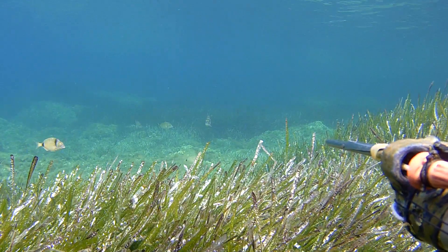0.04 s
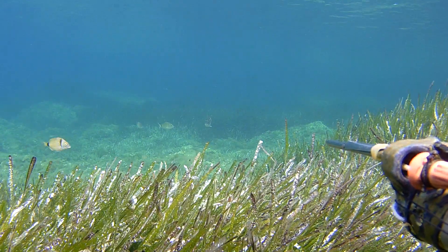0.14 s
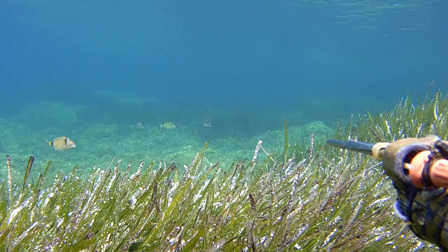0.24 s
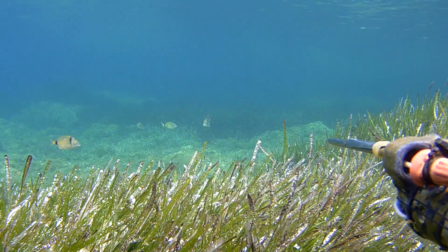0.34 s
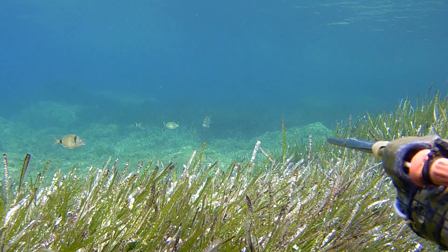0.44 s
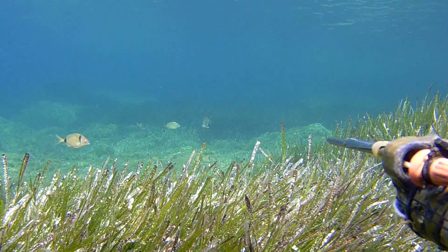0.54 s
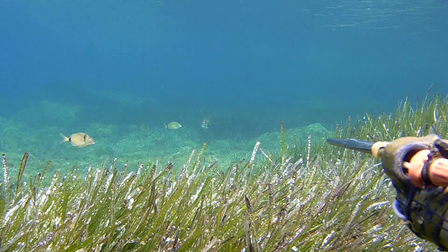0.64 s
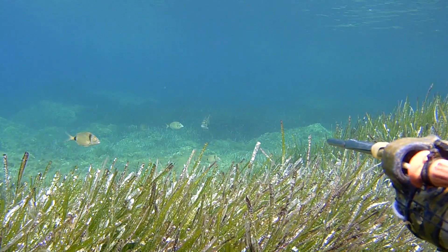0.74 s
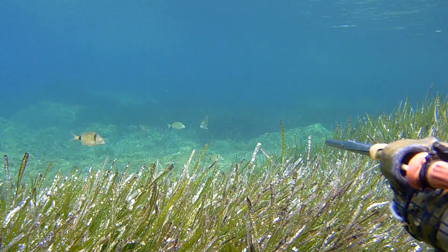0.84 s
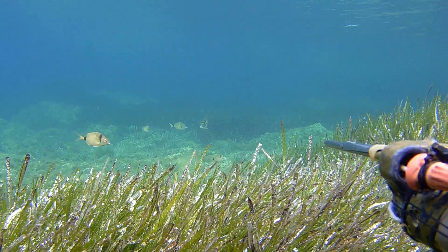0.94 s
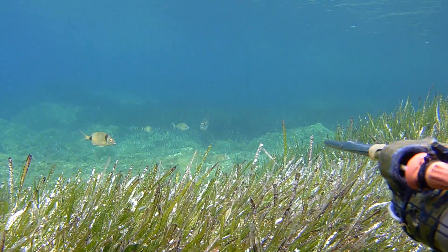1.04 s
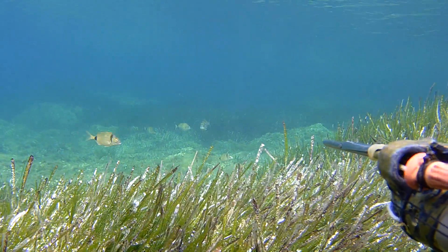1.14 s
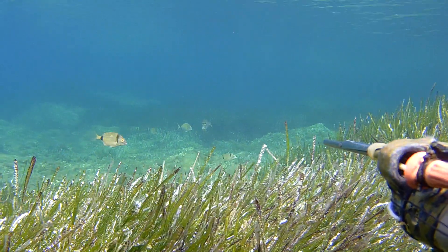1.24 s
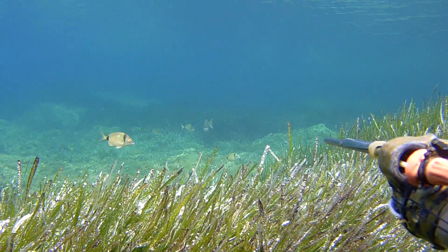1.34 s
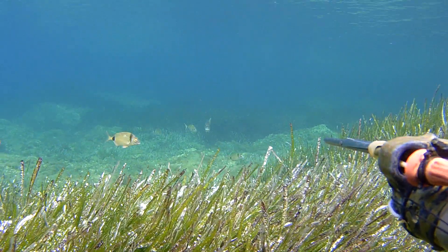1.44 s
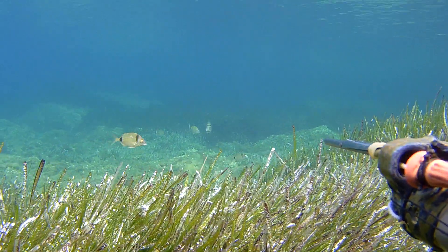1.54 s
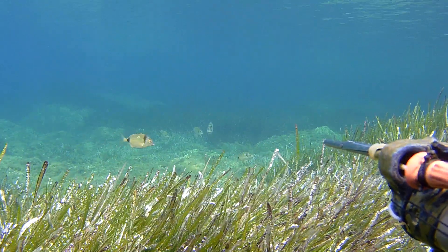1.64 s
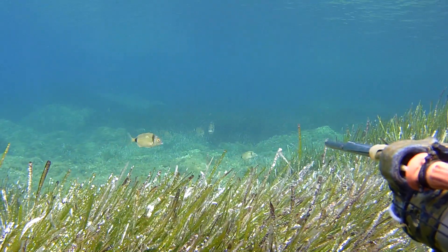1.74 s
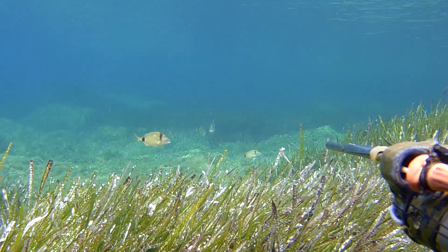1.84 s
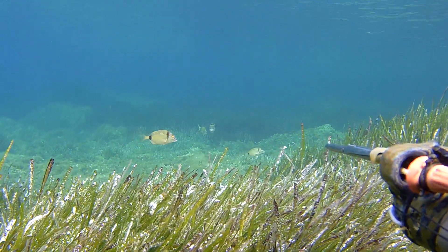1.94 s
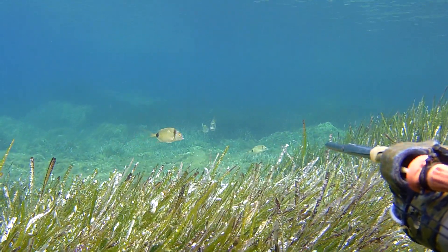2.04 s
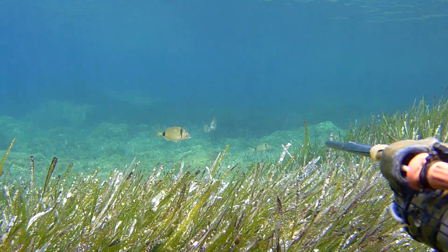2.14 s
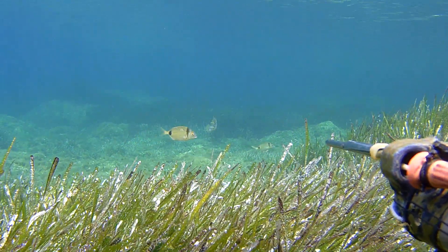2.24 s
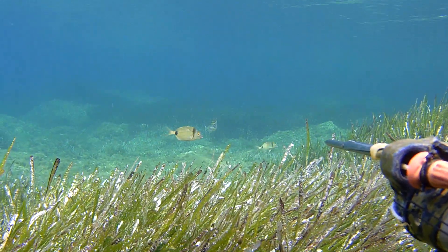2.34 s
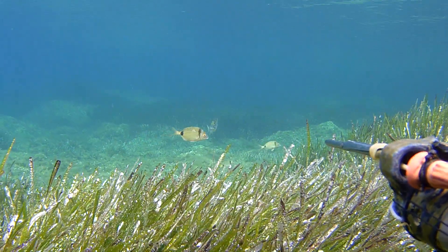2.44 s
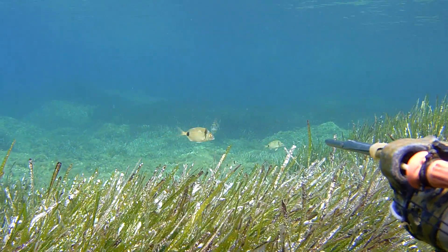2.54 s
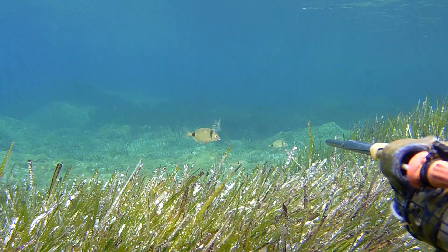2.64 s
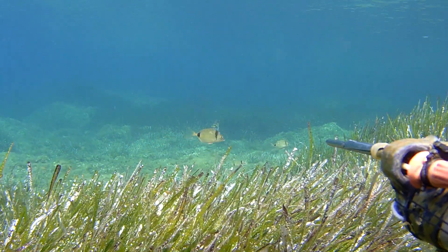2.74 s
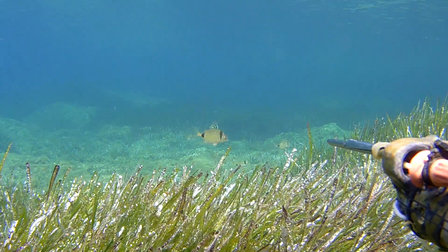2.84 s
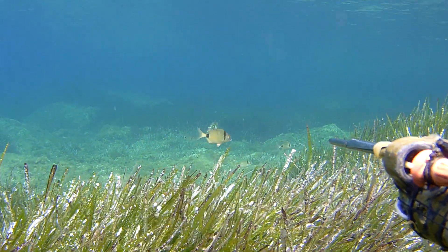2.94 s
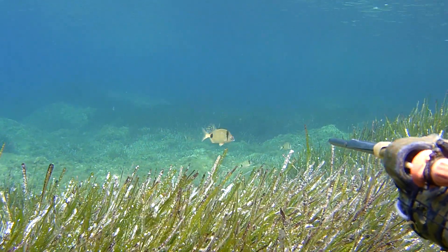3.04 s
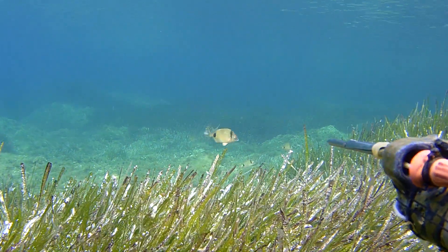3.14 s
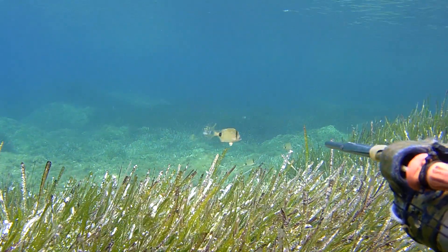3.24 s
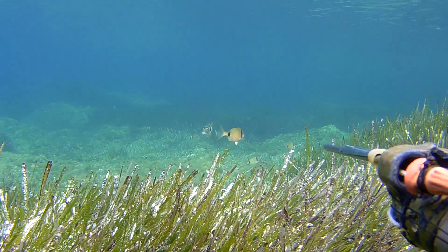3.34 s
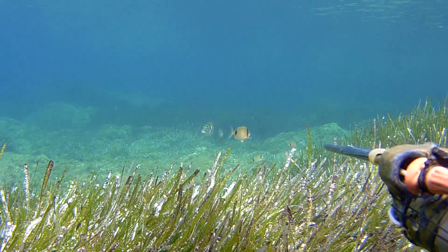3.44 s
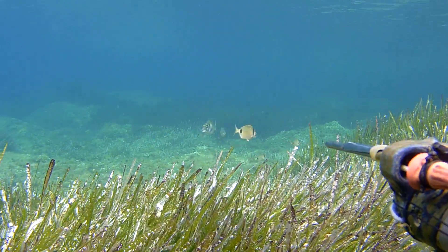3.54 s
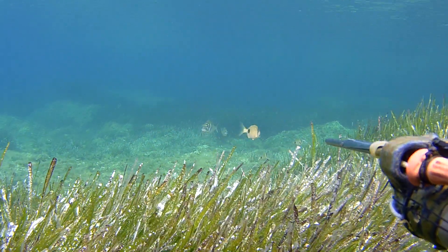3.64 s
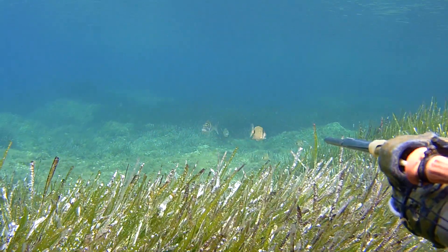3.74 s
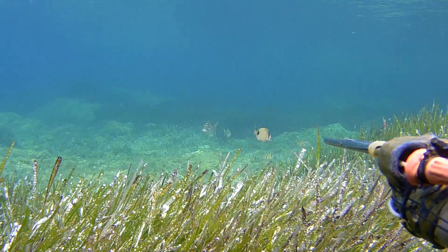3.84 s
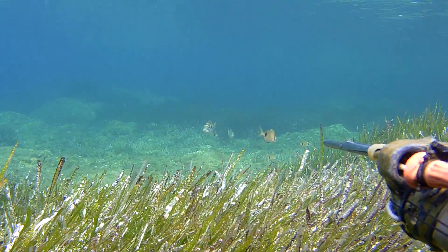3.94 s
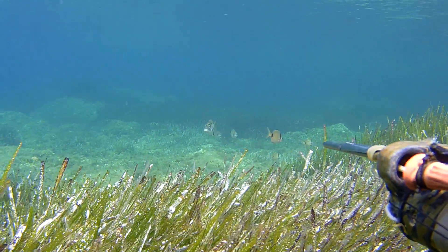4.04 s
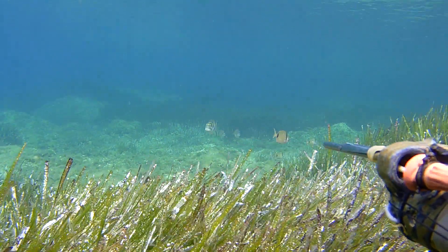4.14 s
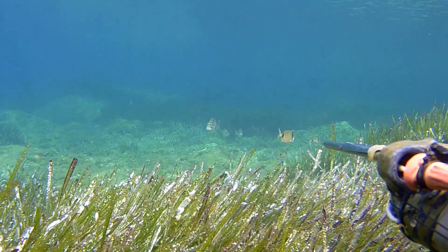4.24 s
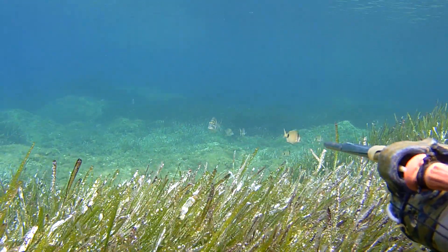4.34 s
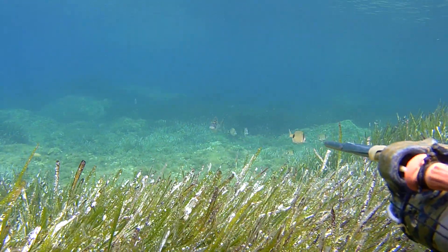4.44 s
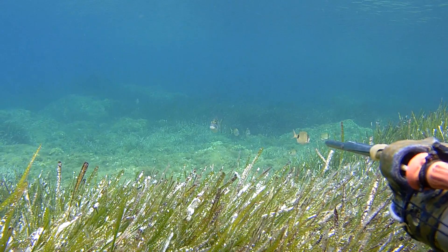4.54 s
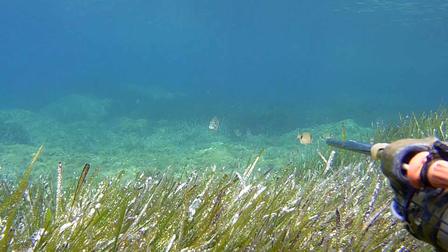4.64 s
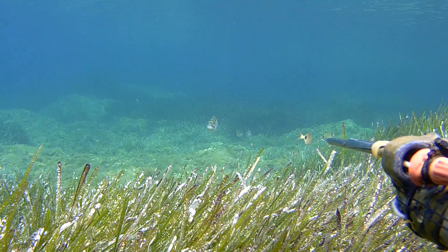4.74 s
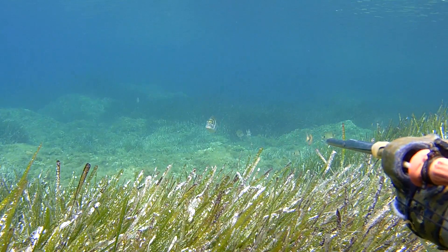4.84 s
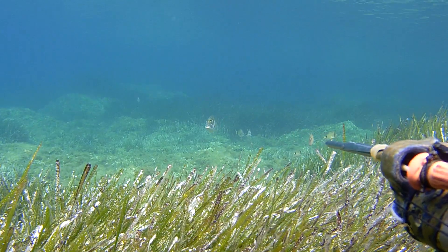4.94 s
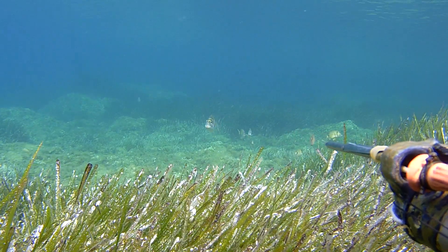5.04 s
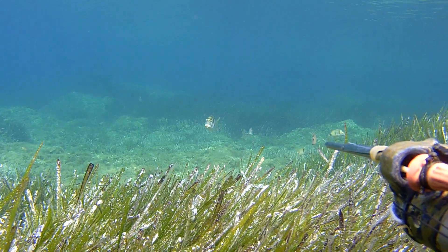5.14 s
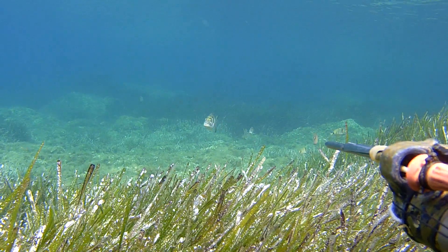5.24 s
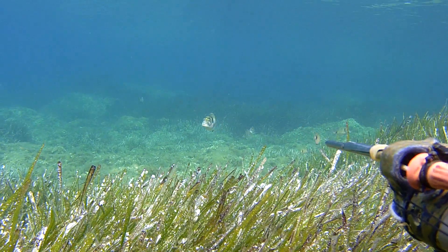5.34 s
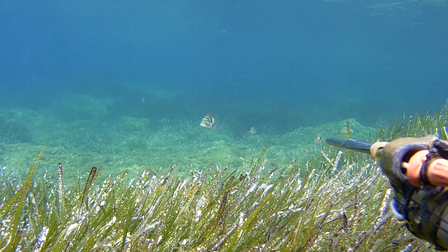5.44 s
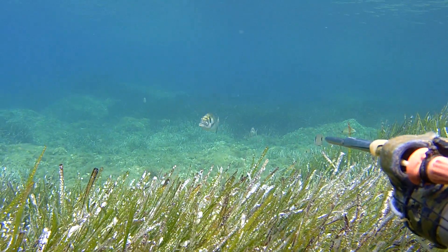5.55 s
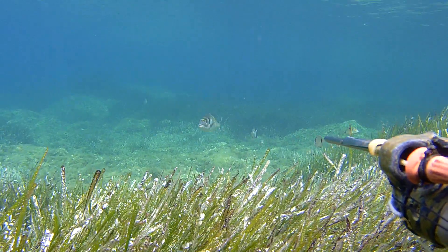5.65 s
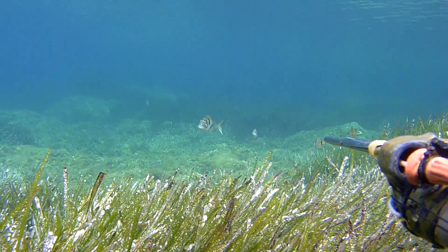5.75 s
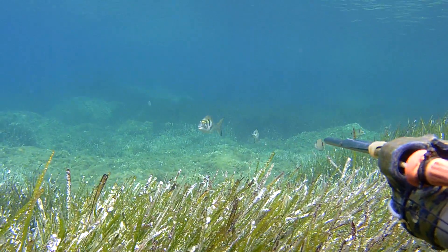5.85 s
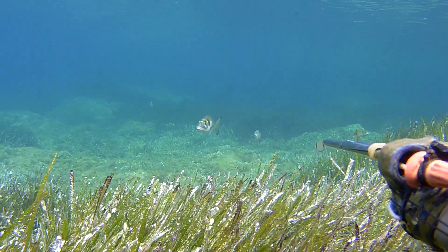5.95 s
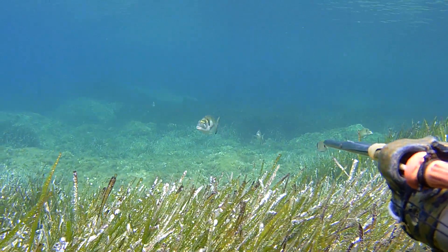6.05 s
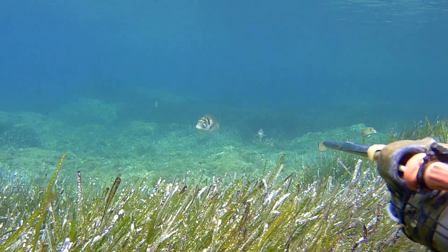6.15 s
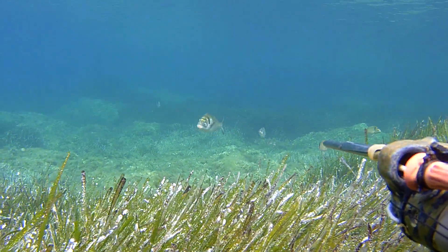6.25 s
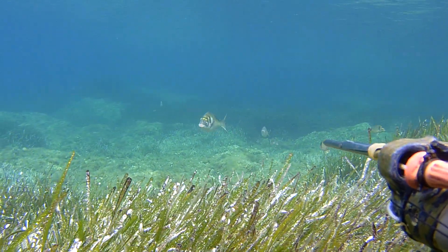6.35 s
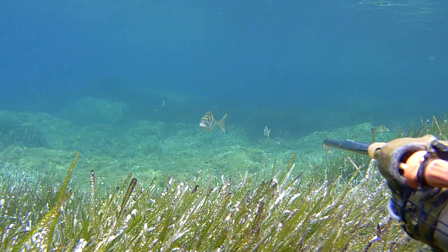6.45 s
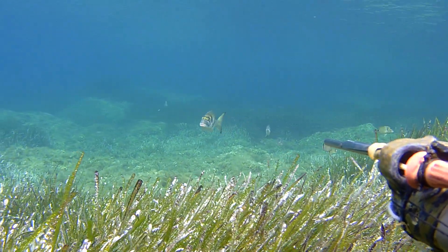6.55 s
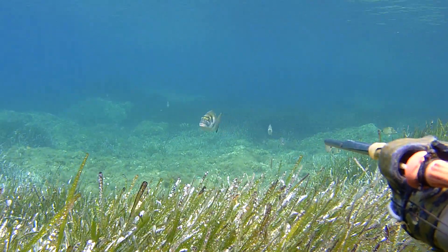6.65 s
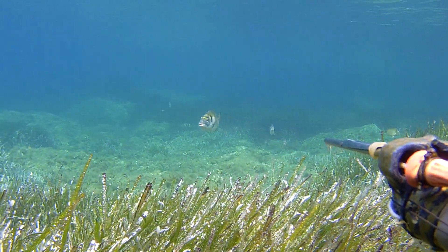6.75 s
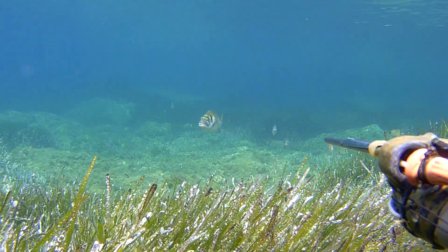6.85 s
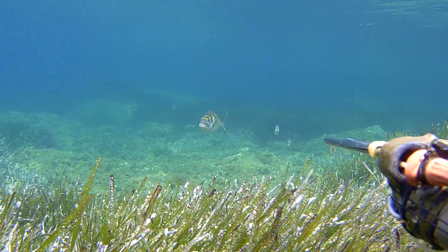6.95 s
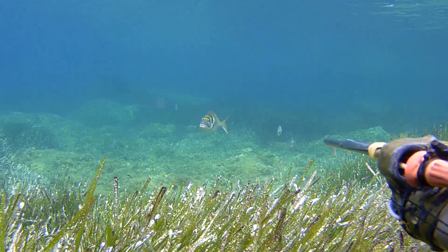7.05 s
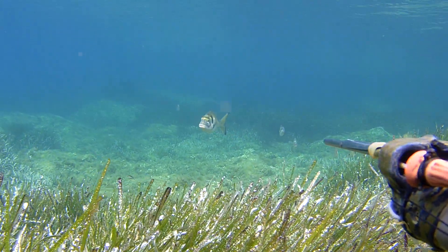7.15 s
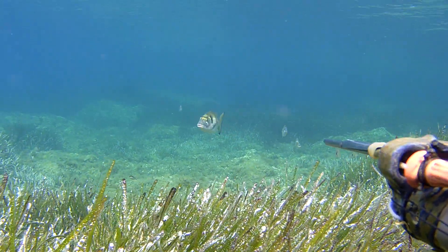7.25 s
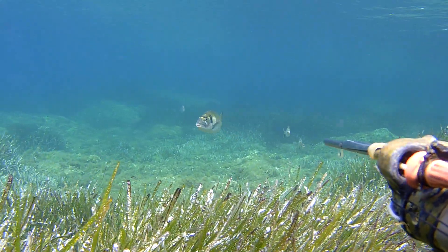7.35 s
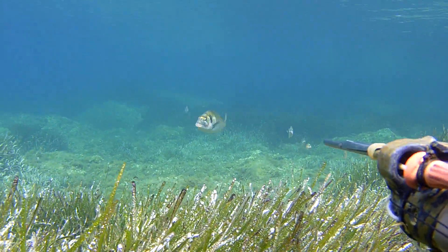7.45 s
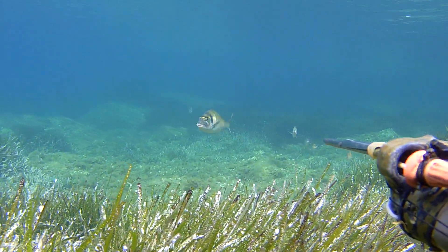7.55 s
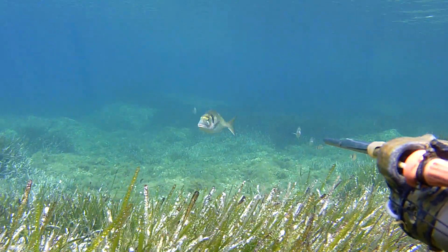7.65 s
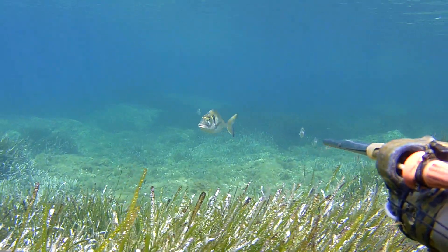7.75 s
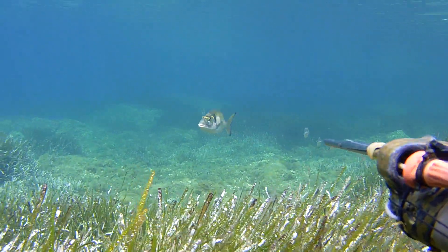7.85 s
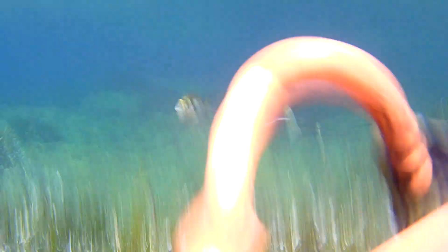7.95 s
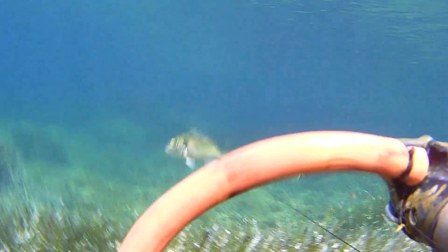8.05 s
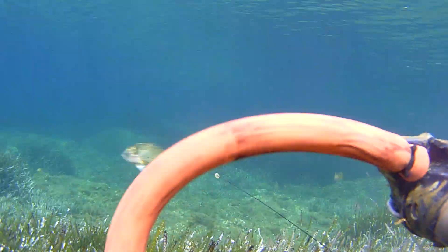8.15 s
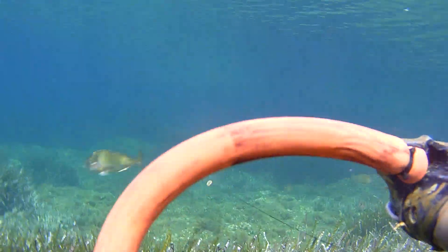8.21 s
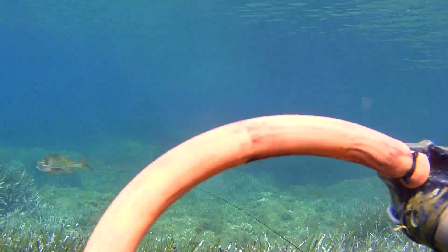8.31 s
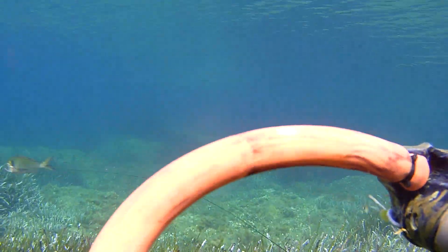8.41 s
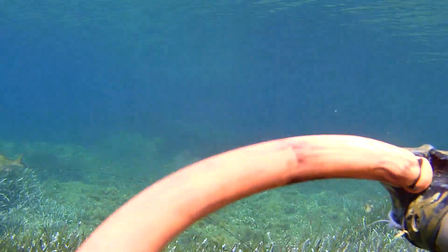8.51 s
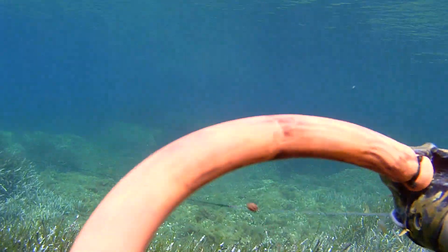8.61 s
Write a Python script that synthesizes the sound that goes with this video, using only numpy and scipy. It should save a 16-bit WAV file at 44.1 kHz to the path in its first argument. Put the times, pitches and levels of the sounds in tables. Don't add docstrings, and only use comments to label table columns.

```python
import sys
import numpy as np
from scipy import signal
from scipy.fft import rfft, irfft
from scipy.io import wavfile

SR = 44100
rng = np.random.default_rng(int(sys.argv[2]) if len(sys.argv) > 2 else 0)


def gain_from_db(level_db):
    decades = np.asarray(level_db, float) / 20
    return 10 ** decades


def output_pcm(signal):
    pcm = np.clip(np.atleast_2d(signal).T, -1, 1) * 32767
    wavfile.write(sys.argv[1], SR, np.round(pcm).astype(np.int16))


N = 382788

# (frequency [Hz], level [dB], t60 [s])
BARREL_LOW_MODES = [(335, -13.5, 0.033), (503.5, -5.5, 0.05), (599, -10.5, 0.089), (731.6, 3.5, 0.033),
                    (865, 4.5, 0.0095)]
BARREL_HIGH_MODES = [(1050, -2.5, 0.013), (1215, 3.5, 0.025), (1390, 5, 0.0031), (1470, 0.5, 0.035),
                     (1748, 2.5, 0.013), (2242, -1, 0.014)]
# (frequency [Hz], level [dB], t60 [s])
WALL_MODES = [(390, 2.5, 0.019), (546, -4.5, 0.35), (630, 4.5, 0.092), (735, 11.5, 0.073)]
LID_MODES = [(1320, -13.5, 0.017), (1464, -8, 0.044), (1740, 2.5, 0.016), (2350, -8, 0.016)]
PORT_MODES = [(2767, 2, 0.015), (3207, 6.5, 0.0085), (3632, 5.5, 0.013), (4530, 8, 0.0096),
              (5630, -10, 0.015)]
RIM_MODES = [(6244, 17, 0.0061), (7300, 16.3, 0.0027), (8910, 9.6, 0.0069), (10500, 13.2, 0.0022),
             (11800, 3.5, 0.0042), (13000, 9.7, 0.0027)]
# (frequency [Hz], level [dB], t60 [s])
SHELL_MODES = [(980, 0, 0.01), (1180, 6, 0.069), (1502, 0.5, 0.12)]
# (time [s], length [s], low barrel [dB], high barrel [dB], crack [dB])
BLOWS = [(7.942, 0.0074, -34, -41, -57), (7.9486, 0.0054, 8, 2.5, -27), (7.965, 0.018, 4.5, 7.5, -25),
         (7.986, 0.011, 8.5, -11.5, -4), (7.996, 0.024, -2.5, 3.5, -6), (8.028, 0.004, -15, -8.5, -3.5),
         (8.038, 0.0049, -7.5, -5, -8.5), (8.049, 0.013, -26, -35, -34), (8.058, 0.0073, -24, -25, -45),
         (8.073, 0.0083, -22, -15, -33), (8.112, 0.0027, -1.5, -10, -21.5), (8.12, 0.0046, -20, -40, -56),
         (8.139, 0.01, -26, -45, -56), (8.152, 0.032, -23, -29.5, -63), (8.2, 0.0023, -42, -40, -44),
         (8.5315, 0.0029, -14, -13, -9.5), (8.5442, 0.0018, -22, -17, -15), (8.573, 0.019, -40, -39, -65)]
# (time [s], level [dB])
KICKS = [
    (7.954, -5),
    (8.001, -3.5),
    (8.118, -22),
    (8.441, -44),
    (8.536, -31),
]
# (time [s], level [dB], pitch [Hz], t60 [s])
THUMPS = [
    (7.905, -46, 27, .9),
    (7.9533, 10.5, 111, 0.052),
    (7.977, 0.5, 324, 0.067),
    (7.994, 10.5, 154.1, 0.071),
    (8.043, -12.5, 322, 0.053),
    (8.094, -17.5, 75, .1),
]
# (time [s], low barrel [dB], high barrel [dB], click [dB])
LINE_TICKS = [(8.222, -60, -48, -54), (8.247, -26, -38, -45), (8.253, -25.5, -40, -58),
              (8.263, -56, -35, -44), (8.282, -24, -27, -39.5), (8.3012, -30, -22.5, -36),
              (8.318, -39, -50, -63), (8.34, -26, -39, -54), (8.348, -25, -34, -43), (8.359, -26, -44, -59),
              (8.381, -34, -52, -39), (8.387, -16.5, -27, -38.5), (8.395, -27, -34, -51),
              (8.405, -21, -36, -52), (8.417, -15, -29, -42), (8.433, -19, -43, -53),
              (8.444, -23, -29, -56), (8.452, -21, -23.5, -30.5), (8.468, -17, -20.5, -37),
              (8.4785, -19, -25, -43), (8.487, -25, -48, -46), (8.496, -23, -28, -47),
              (8.501, -15, -33, -49), (8.51, -19.5, -27, -43), (8.598, -39, -58, -35.5),
              (8.6154, -18, -36, -42), (8.631, -32, -36, -57), (8.639, -46, -38, -46),
              (8.6633, -42, -32, -41), (8.676, -35, -29, -48)]
# (time [s], level [dB])
LINE_PULL = [
    (8.0, -51),
    (8.07, -23),
    (8.105, -37),
    (8.13, -30.5),
    (8.22, -52),
    (8.26, -40),
    (8.47, -40),
    (8.56, -56.5),
    (8.68, -38.5),
]
# (time [s], level [dB], pitch [Hz])
TWANGS = [(8.2403, -44, 1110), (8.249, -34, 1110), (8.278, -24, 1070), (8.283, -35, 1210),
          (8.3017, -22, 1130), (8.3216, -38, 1020), (8.34, -27, 1160), (8.3478, -25.5, 1160),
          (8.36, -28, 1110), (8.39, -22, 1100), (8.396, -25, 1050), (8.4064, -20, 1090),
          (8.4173, -17.5, 940), (8.4443, -19, 965), (8.4547, -17.5, 1040), (8.459, -20, 950),
          (8.4692, -17, 1040), (8.4786, -14.5, 1100), (8.496, -21, 1050), (8.5013, -16, 1140),
          (8.5104, -15, 1100), (8.6506, -31, 942), (8.631, -34, 1800), (8.6645, -17, 1980)]
# (time [s], level [dB], pitch [Hz], t60
# [s])
CLACKS = [(0.6008, -18, 1540, 0.013), (.6, -24.5, 3600, 0.013), (.606, -41, 1760, 0.026),
          (1.4164, -28, 1640, 0.01), (1.4161, -22, 3170, 0.0078), (1.4158, -33.5, 7700, .008),
          (1.416, -36.5, 740, 0.046), (2.5472, -34.5, 1380, 0.014), (2.5472, -25, 3140, 0.0099),
          (2.5472, -26.5, 4600, 0.012), (8.157, -23, 1145, 0.033), (8.2006, -29, 2100, 0.017),
          (8.202, -31, 1670, .016), (8.249, -30, 720, 0.055), (8.302, -21.5, 740, 0.071),
          (8.36, -33, 700, 0.068), (8.452, -28.5, 450, 0.097), (8.48, -27, 492, 0.14),
          (8.534, -11, 720, 0.019), (8.5405, -13.5, 640, 0.017), (8.5327, 0.5, 1600, .02),
          (8.5327, -11, 2700, 0.017), (7.6685, -42, 460, .025), (8.5452, -4, 1717, 0.019),
          (8.619, -28.5, 1500, 0.02), (8.623, -31, 530, 0.05), (8.547, -17, 770, 0.042),
          (8.589, -36, 840, 0.03), (8.617, -23, 710, 0.023), (8.664, -18, 750, 0.044)]
# (time [s], wall [dB], hardness of upper modes [dB], bounce [dB], bounce delay [ms])
KNOCKS = [(0.1199, -40, -5, -16, 9.4), (0.2394, -23, -9, -32, 5.9), (0.359, -39.5, -10, -10, 7.1),
          (0.3805, -22.5, -11, -3.5, 5.1), (0.552, -28, -9, -5.5, 3.6), (0.5992, -28.5, -2.5, -7.5, 8),
          (1.0257, -25, -9, -34, 4.6), (1.157, -25.5, -6, -18, 4.1), (1.33, -27, -7.5, -3.5, 5.5),
          (1.4161, -41, 5, -11, 4.7), (1.7858, -37, -7, -12, 5.5), (1.903, -22.5, -12.5, -11.5, 6.6),
          (1.9743, -21, -9, -30, 6.9), (2.1334, -27.5, -12, -2, 5.6), (2.6958, -37, -8, -9, 4.3),
          (2.7319, -26, -12.5, -2, 5.8), (2.8897, -24, -8.5, -1.5, 4.8), (2.9524, -30, -16, -4.5, 5.6),
          (3.5014, -30, -7.5, -24, 9.5), (3.621, -36.5, -13, -7, 6.8), (3.654, -30.5, -7, 1.5, 7.2),
          (3.816, -31, -10.5, -3.5, 5.4), (4.3916, -28, -13, -13, 4.1), (4.4274, -29, -14.5, -8, 7.2),
          (4.5893, -36.5, -27, -9, 5.3), (4.625, -33, -14, 3.5, 5.4), (4.7363, -28.5, -8, -29, 4.5),
          (5.221, -26.5, -12, -10, 3.7), (5.3384, -27, -9, -6.5, 6.6), (5.4887, -21.5, -10.5, -7.5, 7.6)]
KNOCK_HZ = [763, 730, 757, 727, 708, 607, 730, 738, 730, 727, 760, 728, 738, 728, 771, 727, 755, 730, 770,
            760, 754, 720, 753, 738, 675, 704, 734, 712, 712, 728]
# (time [s], wall [dB])
FAINT_KNOCKS = [(1.011, -43), (2.6365, -43), (2.66, -46), (3.47, -43), (3.484, -48), (3.79, -44), (3.847, -40.5),
                (4.17, -45), (4.37, -40), (5.7292, -41), (6.3235, -42)]
# (time [s], low port [dB], lid [dB], high port [dB], 6 kHz rim [dB])
NEAR_SNAPS = [(0.1331, -43, -54, -54, -59), (0.4552, -52, -64, -43.5, -48), (0.5996, -28.5, -33, -48, -50),
              (0.6853, -55, -58, -60, -64), (0.703, -37.5, -49, -43, -56), (1.178, -29.5, -39.5, -56, -52),
              (1.2981, -44, -35, -58, -62), (1.3058, -42, -48, -47.5, -59), (1.4154, -29, -31, -35, -60),
              (1.486, -36.5, -43.5, -45, -54), (1.6143, -39, -46, -50, -51), (1.756, -44, -48, -52, -50),
              (1.945, -54, -53, -61, -62), (1.968, -42, -43, -45, -47), (2.0115, -59, -63, -61, -55),
              (2.202, -42, -45, -45, -56), (2.2713, -41.5, -53, -44, -48), (2.5463, -37, -36, -34, -40),
              (2.685, -36, -49, -51.5, -65), (2.7142, -44, -43, -49, -58), (3.4251, -38, -63, -53, -46.5),
              (3.459, -57, -57, -64, -71), (3.599, -38, -49, -65, -70), (4.0085, -42, -45.5, -62, -54.5),
              (4.333, -37.5, -61, -48, -51.5), (5.252, -39, -49, -46.5, -54), (5.6436, -32, -42, -46, -51),
              (5.6695, -44, -59, -57, -64), (5.7927, -45, -50, -49, -39.5), (5.798, -37, -51, -44, -63),
              (5.8498, -51, -50, -43.5, -74), (5.985, -50, -61, -64, -69), (6.1884, -47, -52, -43.5, -51),
              (6.321, -40, -38.5, -64, -54), (6.329, -48, -58, -47, -50.5), (6.684, -38.5, -44, -42, -61),
              (6.955, -49, -48, -62, -61), (6.9728, -40.5, -42, -43.5, -64), (7.2537, -36.5, -37, -46, -75),
              (7.872, -41.5, -46, -62, -51)]
# (time [s], level [dB])
SPARKS = [(0.0186, -47.5), (0.133, -43), (0.22, -50), (0.302, -50), (0.5541, -43), (0.599, -53), (0.6, -44),
          (0.7037, -37.5), (0.7921, -52), (1.04, -43), (1.1768, -40), (1.2186, -52), (1.2406, -50),
          (1.2974, -44.5), (1.342, -48), (1.415, -35.5), (1.486, -43.5), (1.6145, -42.5), (1.6397, -55),
          (1.7424, -57), (1.7554, -37), (1.8971, -47), (1.9669, -48), (2.2014, -43), (2.271, -42),
          (2.345, -46), (2.4942, -43), (2.546, -29.5), (2.6455, -45), (2.8195, -49), (3.0126, -45),
          (3.3084, -41.5), (3.3583, -51), (3.39, -50), (3.4246, -44), (3.5124, -52), (3.6406, -56),
          (4.008, -47), (4.0177, -40), (4.2244, -44), (4.2672, -46), (4.333, -40.5), (4.8643, -54),
          (5.1392, -45), (5.1614, -46), (5.252, -39.5), (5.3522, -52), (5.6432, -43), (5.693, -49),
          (5.9838, -52), (6.1175, -57), (6.319, -49), (6.4088, -41), (6.6817, -44), (6.973, -40.5),
          (7.1053, -48), (7.2534, -50), (7.4565, -60), (7.778, -41), (7.8715, -48)]
# (time [s], port [dB], lid [dB])
FAR_SNAPS = [(0.218, -34.5, -36), (0.4255, -32.5, -67), (0.7748, -40.5, -28.5), (0.9217, -31.5, -28),
             (0.961, -35, -32), (1.1057, -38, -26), (1.219, -35.5, -26), (1.3644, -35, -64),
             (1.397, -37, -36), (1.7415, -30, -35.5), (1.897, -33.5, -51), (2.4032, -32.5, -48),
             (2.7587, -36, -25), (2.9835, -35.5, -31), (3.0118, -33, -28.5), (3.3573, -35, -51),
             (3.5134, -34, -36), (3.6401, -35, -27.5), (3.6657, -31.5, -42), (4.2268, -37, -29),
             (4.8644, -30.5, -53), (5.1814, -34.5, -33), (5.3515, -35, -62), (5.4687, -41, -39),
             (5.671, -36.5, -42), (6.117, -32.5, -50), (6.442, -35.5, -32), (7.1618, -39.5, -26),
             (7.456, -48, -21.5), (7.473, -33, -26)]
# (time [s], port [dB], lid [dB])
FAINT_SNAPS = [(0.194, -45, -45.5), (0.2888, -45, -62), (0.476, -39, -54), (0.7923, -41, -52),
               (1.0188, -42, -50), (1.041, -46, -53), (1.2408, -38.5, -55), (1.646, -40, -63),
               (1.793, -40, -60), (1.8332, -45, -43), (2.025, -42, -63), (2.338, -43, -64),
               (2.82, -64, -63), (3.3095, -42, -53), (3.39, -44, -65), (3.76, -40, -63), (3.8965, -46, -44),
               (3.9784, -50, -59), (4.0865, -42.5, -44), (4.2672, -44.5, -54), (5.0475, -47.5, -63),
               (5.1028, -47, -59), (5.14, -40.5, -48), (5.161, -41, -46), (5.3118, -43, -45),
               (5.9186, -49, -50), (6.102, -47, -52), (6.229, -41, -51), (6.3816, -43, -47),
               (6.5141, -50, -62), (6.634, -39.5, -59), (7.23, -48, -51), (7.421, -40, -43),
               (7.536, -39, -57), (7.5682, -43, -61), (7.6557, -44, -45), (7.775, -49, -46)]
# (frequency [Hz], density [dB per Hz])
HISS_SPECTRUM = [(12, -40), (20, 6.5), (65, -3.5), (277, -3), (1220, -13), (1660, -19.5), (2530, -20),
                 (3630, -25), (4060, -23), (4540, -25.5), (5080, -26.5), (14300, -32.5), (16000, -34)]


def unit(x):
    return x / np.sqrt(np.mean(x ** 2))


def highpass(x, hz, order):
    return signal.sosfilt(signal.butter(order, hz, "highpass", fs=SR, output="sos"), x)


def band(lo_hz, hi_hz):
    sos = signal.butter(3, [lo_hz, hi_hz], "bandpass", fs=SR, output="sos")
    return unit(signal.sosfilt(sos, rng.standard_normal(N)))


def curve(table):
    s, db = np.transpose(table)
    return gain_from_db(np.interp(np.arange(N) / SR, s, db, left=-200))


def jolt(s, db, rise_db_s, fall_db_s):
    t = np.arange(N) / SR - s
    return gain_from_db(db + np.minimum(rise_db_s * t, -fall_db_s * t))


def bursts(times_s, db, shapes):
    out = np.zeros(N + shapes.shape[1])
    for s, gain, shape in zip(times_s, gain_from_db(db), shapes):
        start = int(s * SR)
        out[start:start + len(shape)] += gain * shape
    return out[:N]


def contacts(length_s, sparse_db, size=2048):
    length_s = np.maximum(length_s, 1e-4)[:, None]
    t = np.arange(size) / SR
    shape = (len(length_s), size)
    spray = rng.standard_normal(shape) * gain_from_db(sparse_db * rng.exponential(size=shape))
    spray = spray * np.minimum(t / (0.048 * length_s), 1) * np.exp(-(t / length_s) ** 3)
    return spray / np.sqrt(np.sum(spray ** 2, axis=1, keepdims=True))


def ring(x, modes):
    t = np.arange(4096) / SR
    response = np.zeros(len(t))
    for k, (hz, db, t60_s) in enumerate(modes):
        response += (-1) ** k * gain_from_db(db) * np.sin(2 * np.pi * hz * t) * 1000. ** (-t / t60_s)
    return signal.oaconvolve(x, response / np.max(np.abs(response)))[:N]


def patchy(times_s, db, spray, modes, spread_db):
    spots_db = spread_db * rng.standard_normal((len(modes), len(times_s)))
    top_db = max(mode[1] for mode in modes)
    out = np.zeros(N)
    for k, (hz, mode_db, t60_s) in enumerate(modes):
        r = 1000. ** (-1 / (t60_s * SR))
        w = 2 * np.pi * hz / SR
        force = (-1) ** k * bursts(times_s, db + mode_db - top_db + spots_db[k], spray)
        out += signal.lfilter([0, r * np.sin(w)], [1, -2 * r * np.cos(w), r * r], force)
    return out


def strike(modes, t, detune):
    t = np.maximum(t, 0)
    rows = 0
    for hz, db, t60_s in modes:
        rows = rows + gain_from_db(db) * np.sin(2 * np.pi * hz * detune * t) * 1000. ** (-t / t60_s)
    rows = rows * np.minimum(t / 0.0012, 1)
    return rows / np.max(np.abs(rows), axis=1, keepdims=True)


def gun_blows():
    s, length_s, low_db, high_db, crack_db = np.transpose(BLOWS)
    spray = contacts(length_s, 2.82)
    groups = ((BARREL_LOW_MODES, low_db), (BARREL_HIGH_MODES, high_db),
              (PORT_MODES, crack_db), (RIM_MODES, crack_db - 0.5))
    return sum(ring(bursts(s, db + 4.0, spray), modes) for modes, db in groups)


def recoil():
    rise_db_s, release_s = 5000, KICKS[0][0]
    shudder = sum(jolt(s, db, rise_db_s, 463) for s, db in KICKS)
    bob = jolt(release_s, 3, rise_db_s, 71) * jolt(release_s + 0.072, 0, 0, 350)
    bob = bob + jolt(release_s, -46, rise_db_s, 0)
    swing = np.sin(2 * np.pi * 20.0 * (np.arange(N) / SR - 7.963))
    rumble, drag = band(70.0, 195), band(121.4, 168)
    heave = gain_from_db(-6.0) * band(31.6, 84)
    return gain_from_db(-1) * curve(LINE_PULL) * (drag + heave) + shudder * (rumble + heave) + bob * swing


def thumps():
    s, db, hz, t60_s = np.transpose(THUMPS)[:, :, None]
    t = np.arange(6000) / SR
    return bursts(s[:, 0], db[:, 0], -np.sin(2 * np.pi * hz * t) * 1000. ** (-t / t60_s))


def line_ticks():
    s, low_db, high_db, click_db = np.transpose(LINE_TICKS)
    rim_db = click_db - 10 - 0.68 * (low_db + 32)
    spray = contacts(np.full(len(s), .0009), 4.4, size=512)
    groups = ((BARREL_LOW_MODES, low_db - 3.5), (BARREL_HIGH_MODES, high_db + 3.0),
              (PORT_MODES, click_db + 3.0), (RIM_MODES, rim_db + 7.0))
    return sum(ring(bursts(s, db, spray), modes) for modes, db in groups)


def line_scrape():
    grit = rng.standard_normal(N) * gain_from_db(5.2 * rng.exponential(size=N))
    groups = ((BARREL_LOW_MODES, 3.0), (BARREL_HIGH_MODES, -3.5), (PORT_MODES, -17.0), (RIM_MODES, -23.0))
    return curve(LINE_PULL) * sum(gain_from_db(db) * unit(ring(grit, modes)) for modes, db in groups)


def twangs_and_clacks():
    twang_t60_s, rise_s = 0.015, 0.00057
    rows = [(*row, twang_t60_s) for row in TWANGS] + CLACKS
    s, db, hz, t60_s = np.transpose(rows)[:, :, None]
    t = np.arange(3000) / SR
    phase = 2 * np.pi * hz * t * (1 - 0.07 * np.minimum(t / t60_s, 2))
    pluck = np.sin(phase) * np.minimum(t / rise_s, 1) * 1000. ** (-t / t60_s)
    return bursts(s[:, 0] - .0006, db[:, 0] + 2.5, pluck)


def knocks():
    faint_hard_db, faint_bounce_db, faint_bounce_ms = -9, -8.5, 4.18
    faint_knocks = [(*row, faint_hard_db, faint_bounce_db, faint_bounce_ms) for row in FAINT_KNOCKS]
    s, wall_db, hard_db, bounce_db, bounce_ms = np.transpose(KNOCKS + faint_knocks)
    bounce_s = (bounce_ms * 1e-3 + 1e-5 * rng.random(len(s)))[:, None]
    bounce = gain_from_db(bounce_db)[:, None]
    lead_s = .003
    s, t = s - lead_s, np.arange(6000) / SR - lead_s
    chance = rng.random((len(s), 5, 1))
    detune = 0.968 + 0.083 * chance[:, 3]
    wall_hz = 733
    landing = np.concatenate([np.array(KNOCK_HZ)[:, None] / wall_hz, detune[len(KNOCK_HZ):]])
    damping = gain_from_db(-13 * np.clip((t - .005 - bounce_s) / 0.0075, 0, 1))
    choke = gain_from_db(-1795 * np.clip(t - .0025, 0, .006))

    def tap_and_bounce(modes, spot):
        forerunner = 0.042 * strike(modes, t + 0.00153, spot)
        tap = choke * strike(modes, t, spot)
        return damping * (forerunner + tap + bounce * strike(modes, t - bounce_s, spot))

    late = t - .010 - bounce_s - 0.0043 * chance[:, 0]
    swell = np.clip(late / 0.011, 0, 1) * np.exp(-t / 0.02)
    overtone = 0.081 * np.sin(2 * np.pi * (200 + 90 * chance[:, 4]) * late)
    thud = swell * (np.sin(2 * np.pi * 150 * late) + overtone)
    thud_db = -37.5 + 0.85 * (wall_db + 20 * np.log10(1 + gain_from_db(bounce_db)) + 20)
    heave = np.sin(2 * np.pi * (22 + 14 * chance[:, 1]) * t) * (np.abs(t) / 0.039) * np.exp(1 - t / 0.03)
    sway = np.sin(2 * np.pi * (55 + 35 * chance[:, 2]) * t) * (np.abs(t) / 0.017) * np.exp(1 - t / 0.015)
    heave_db = -46.0 + 0.85 * (wall_db + 24.5)
    return (bursts(s, wall_db + 1.37, tap_and_bounce(WALL_MODES, landing))
            + bursts(s, wall_db + hard_db - 2.0, tap_and_bounce(SHELL_MODES, detune))
            + bursts(s, thud_db + 10.0, thud)
            + bursts(s, heave_db, heave + 0.84 * sway))


def near_snaps():
    s, low_db, lid_db, high_db, rim_db = np.transpose(NEAR_SNAPS)
    spray = contacts(np.full(len(s), .0012), 6.2, size=1024)
    spray = spray + gain_from_db(-11.5) * contacts(np.full(len(s), .012), 2.4, size=1024)
    *low_port, fourth, fifth = PORT_MODES
    groups = ((low_port, low_db - 1.5), (LID_MODES, lid_db + 1.5),
              ([fourth], high_db + 7.5), ([fifth, RIM_MODES[0]], rim_db + 11.5))
    return sum(patchy(s + 0.00018, db, spray, modes, spread_db=3.5) for modes, db in groups)


def sparks():
    s, db = np.transpose(SPARKS)
    spray = contacts(np.full(len(s), .0011), 4.3, size=512)
    spray = spray + gain_from_db(-5.0) * contacts(np.full(len(s), .005), 3.25, size=512)
    fizz = highpass(bursts(s + 0.00018, db - 19.0, spray), 9000, 2)
    return fizz + patchy(s + .00021, db, spray, RIM_MODES[1:], spread_db=3.5)


def far_snaps():
    far = FAR_SNAPS + [(s - .001, port_db + 5.0, lid_db + 14.0) for s, port_db, lid_db in FAINT_SNAPS]
    for place, luck in rng.random(size=(160, 2)):
        crowd_db = -53.5 - 5.5 * np.log(luck + 0.027)
        far.append((place * N / SR, crowd_db, -35.5 - 6 * abs(rng.standard_normal())))
    s, port_db, lid_db = np.transpose(far)
    rim_db = -53.5 + 0.79 * (port_db + 37) + 3 * rng.standard_normal(len(s))
    s = s + 0.001112
    spray = contacts(0.00062 + 0.0029 * rng.random(len(s)) ** 2, 9.9, size=1024)
    lag = rng.integers(8, 60, len(s))
    spray = spray + 0.27 * np.array([np.roll(row, k) for row, k in zip(spray, lag)])
    spray = spray + gain_from_db(-12.5) * contacts(np.full(len(s), .012), 3.5, size=1024)
    fizz = highpass(bursts(s, rim_db - 8, spray), 9000, 2)
    groups = ((PORT_MODES, port_db - 10.0), (LID_MODES, lid_db - 14.5), (RIM_MODES, rim_db + 3.0))
    return fizz + sum(patchy(s, db, spray, modes, spread_db=1.94) for modes, db in groups)


def glints():
    place, luck = rng.random(size=(2, 220))
    spray = contacts(np.full(len(place), .0008), 4.0, size=128)
    return highpass(bursts(place * N / SR, -60 - 2 * np.log(luck + .03), spray), 4500, 1)


def meadow():
    count = 2600
    s = rng.random(count) * N / SR
    loud_db = 3.6 * np.minimum(rng.exponential(size=count), 5)
    tint_db = 2.36 * rng.standard_normal((3, count))
    spray = contacts(np.full(count, .002), 5.2, size=256)
    groups = zip((LID_MODES, PORT_MODES, RIM_MODES), (-74, -70.5, -70.5), tint_db)
    return sum(patchy(s, db + loud_db + tint, spray, modes, spread_db=4.0) for modes, db, tint in groups)


def hiss():
    hz, db = np.transpose(HISS_SPECTRUM)
    colour = gain_from_db(np.interp(np.log(np.fft.rfftfreq(N, 1 / SR) + 1), np.log(hz), db))
    return gain_from_db(-56) * unit(irfft(rfft(rng.standard_normal(N)) * colour, N))


def scene():
    shot = gun_blows() + recoil() + thumps()
    line = line_ticks() + line_scrape() + twangs_and_clacks()
    shrimp = near_snaps() + sparks() + far_snaps() + glints()
    return (shot + line + knocks() + shrimp + meadow() + hiss())[None]


def low_pass(x):
    return signal.sosfilt(signal.butter(12, 16480, fs=SR, output="sos"), x)


def record(dry):
    clip_level, top_hz = .33, 16000
    x = np.clip(dry, -clip_level, clip_level)
    x = x + 0.041 * highpass(dry - x, 400, 1)
    x = highpass(x, 1.5, 1)
    x = signal.sosfilt(signal.ellip(8, .2, 70, top_hz, fs=SR, output="sos"), x)
    return low_pass(x)


dry = scene()
out = record(dry)
output_pcm(out)
```